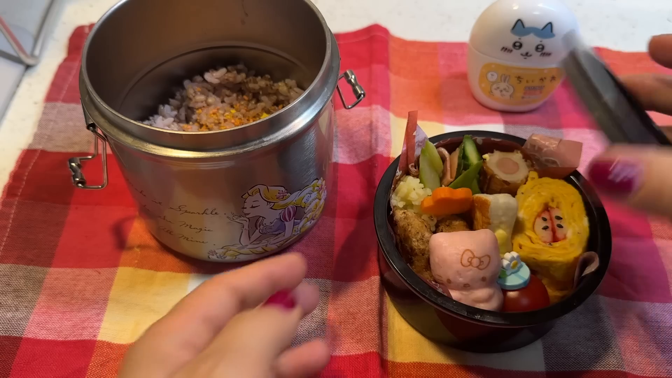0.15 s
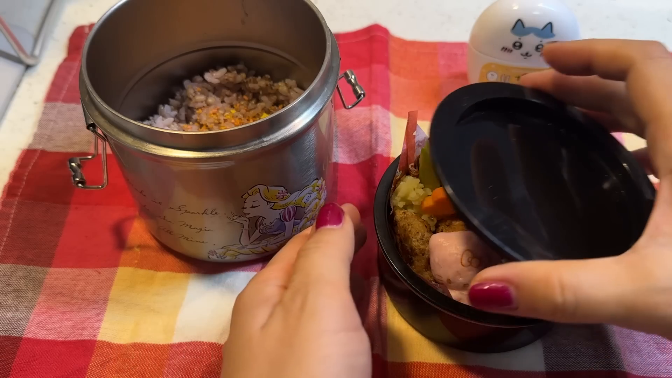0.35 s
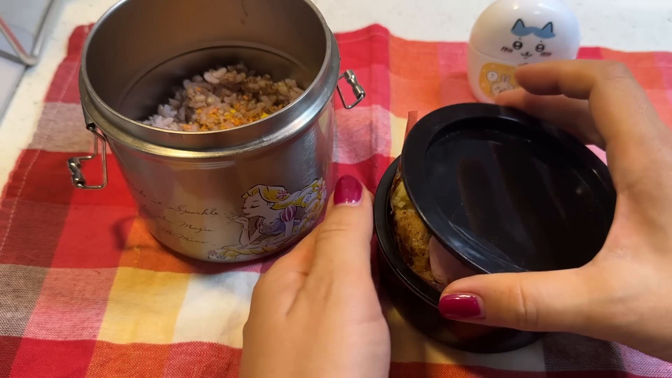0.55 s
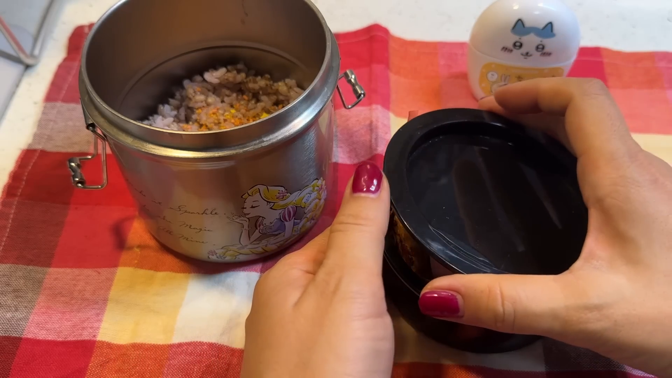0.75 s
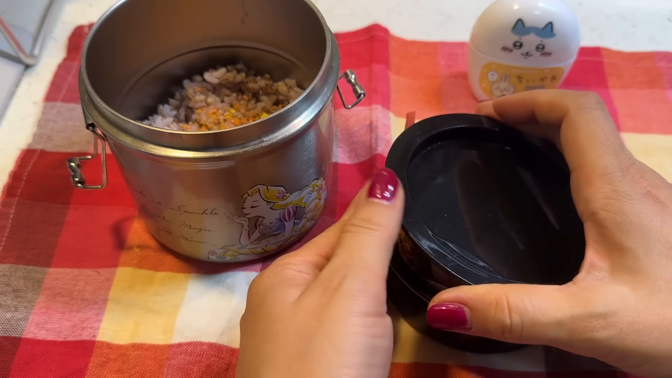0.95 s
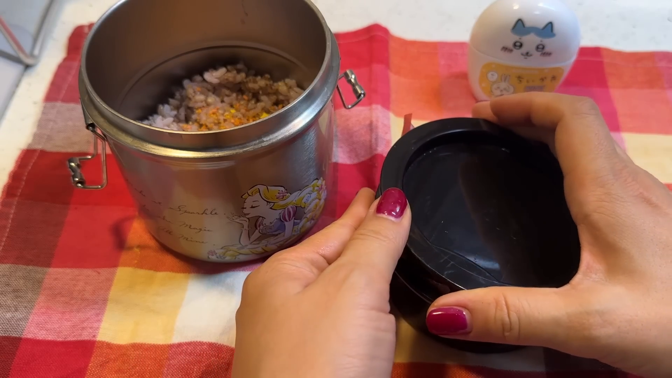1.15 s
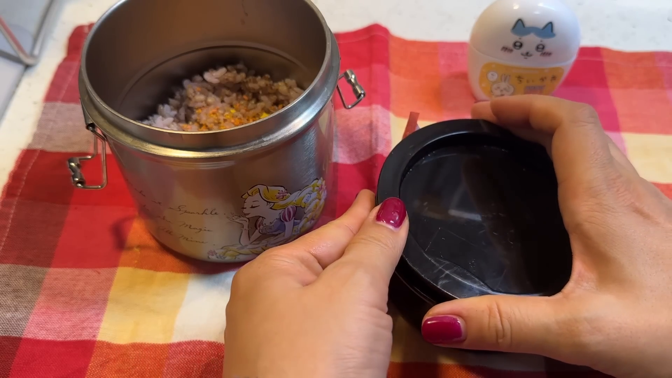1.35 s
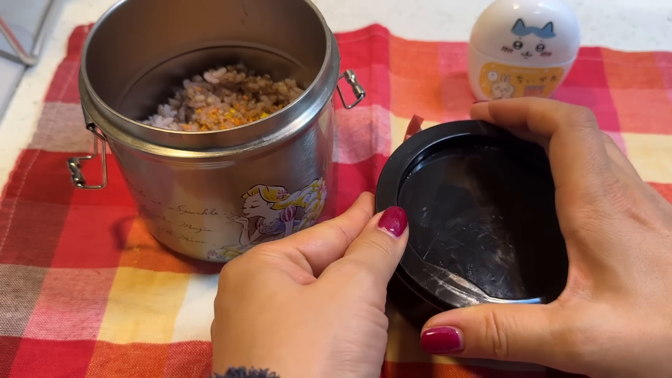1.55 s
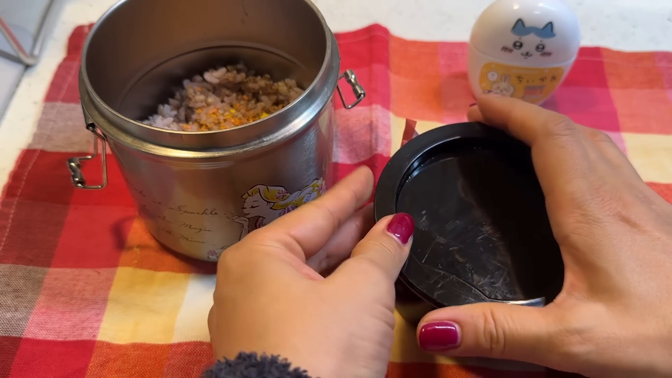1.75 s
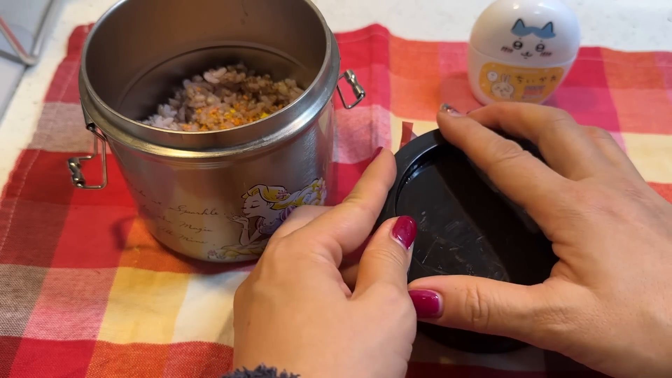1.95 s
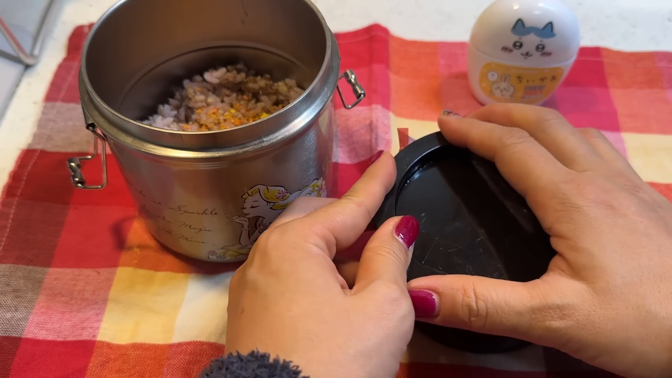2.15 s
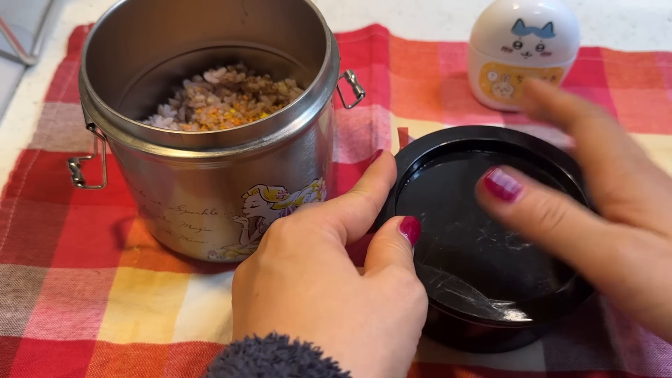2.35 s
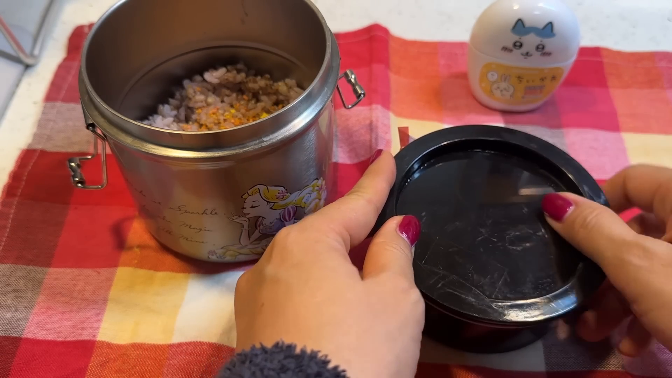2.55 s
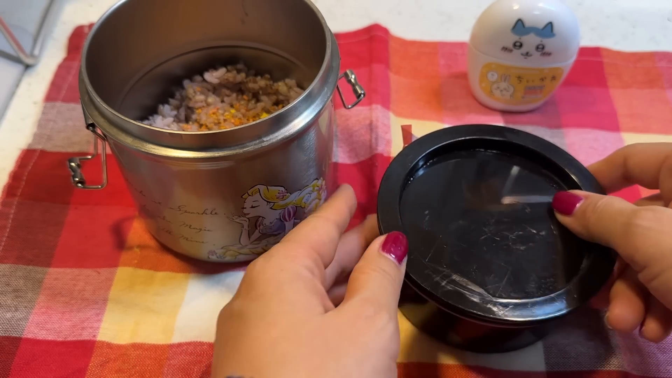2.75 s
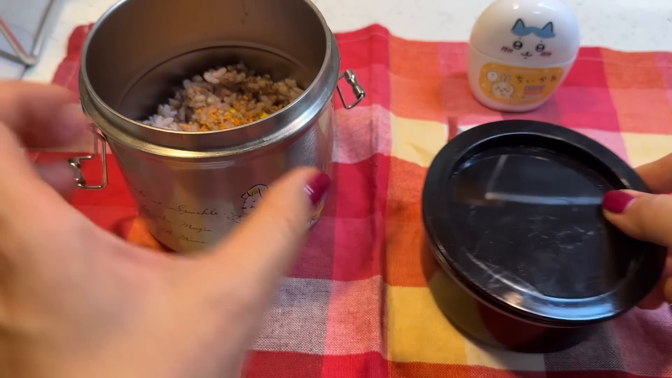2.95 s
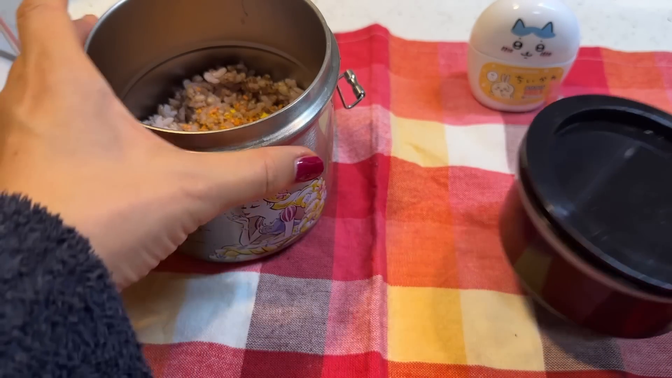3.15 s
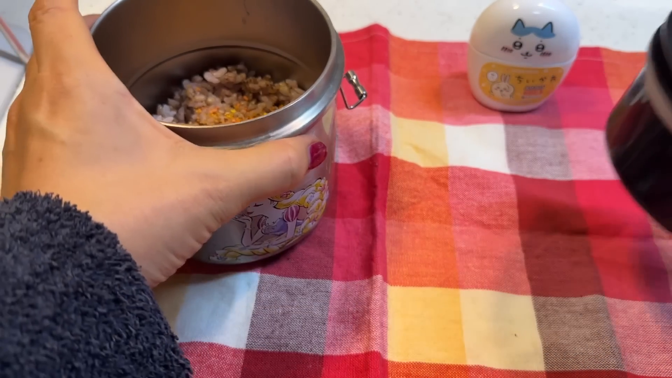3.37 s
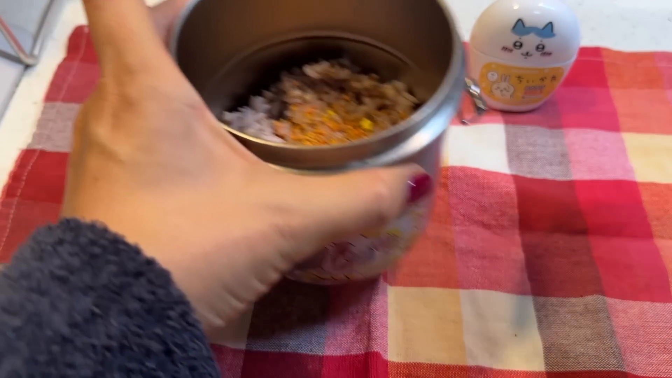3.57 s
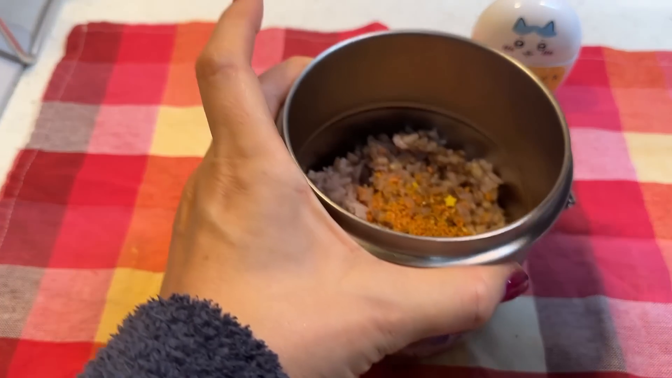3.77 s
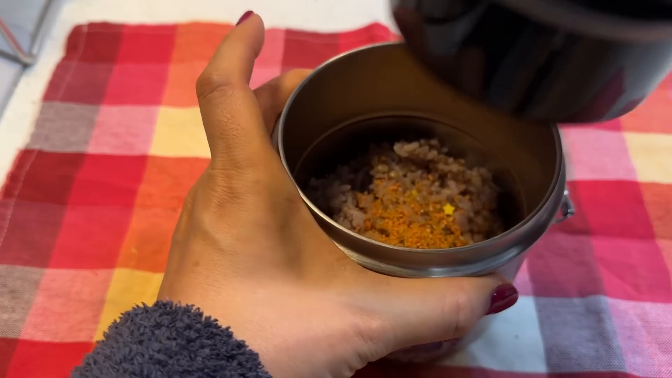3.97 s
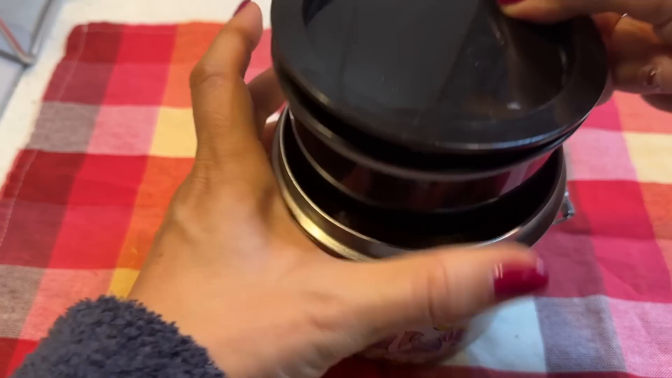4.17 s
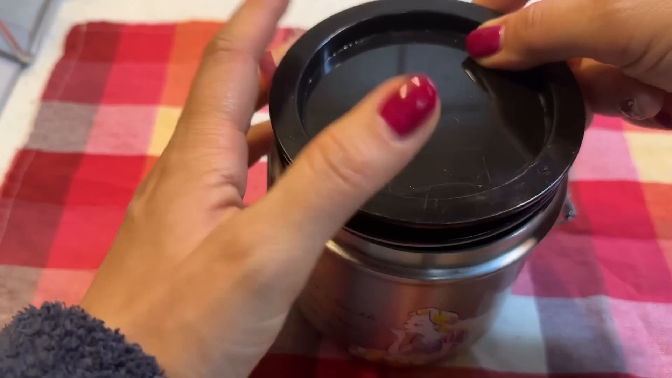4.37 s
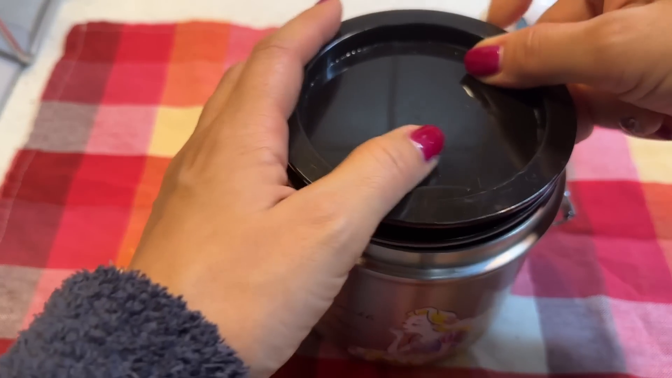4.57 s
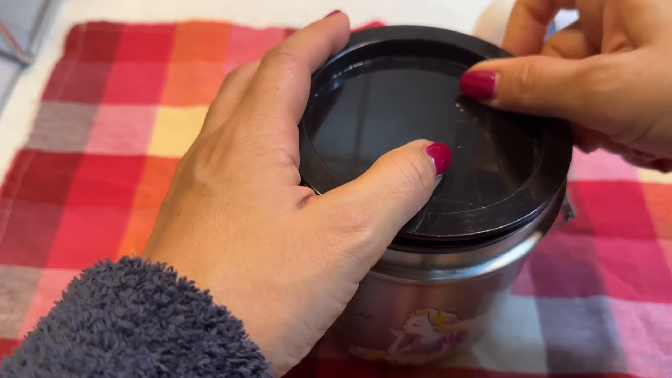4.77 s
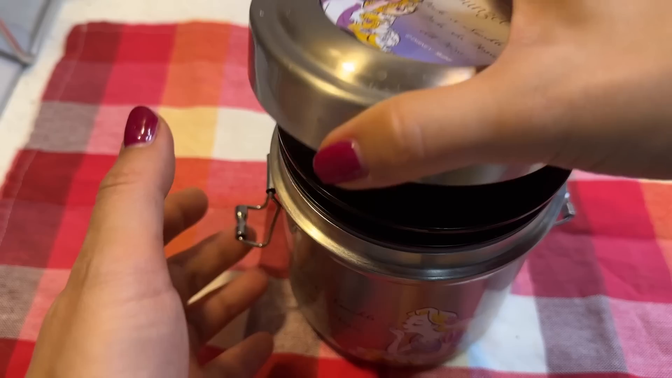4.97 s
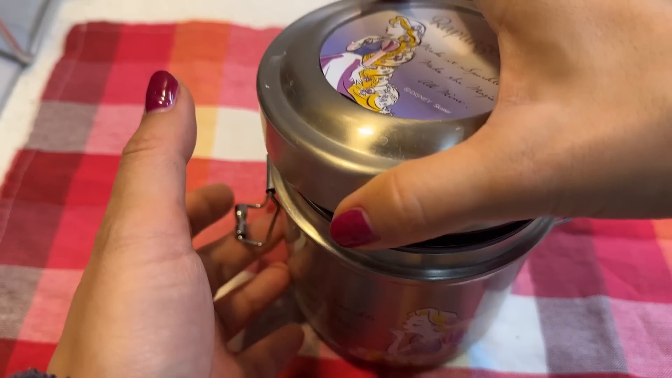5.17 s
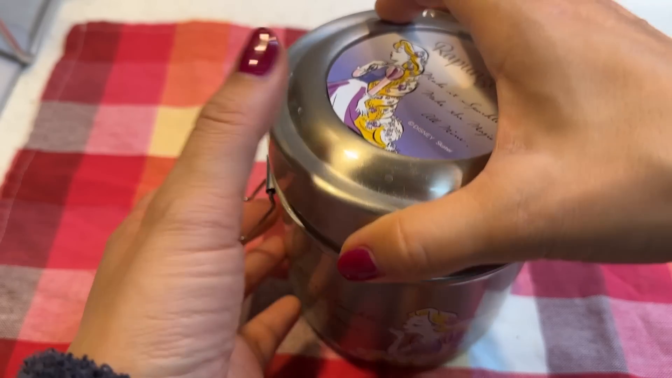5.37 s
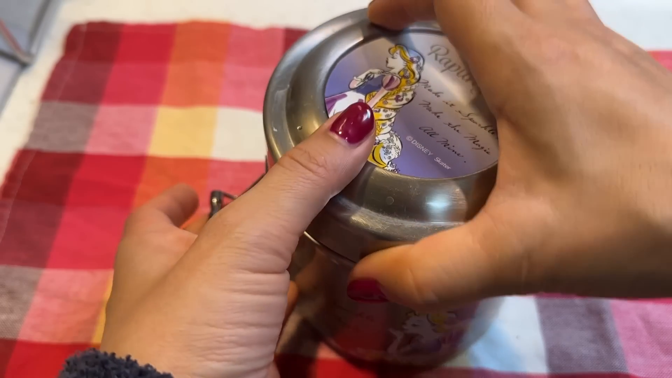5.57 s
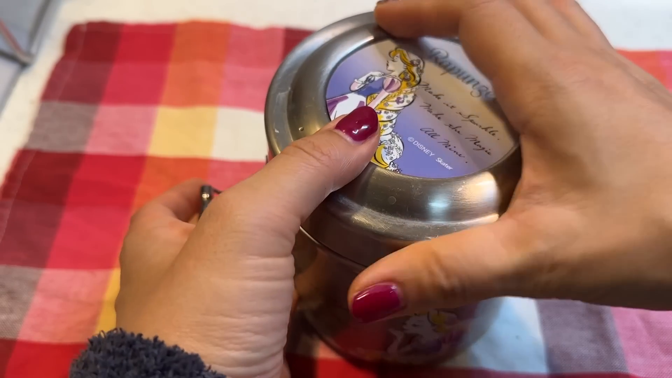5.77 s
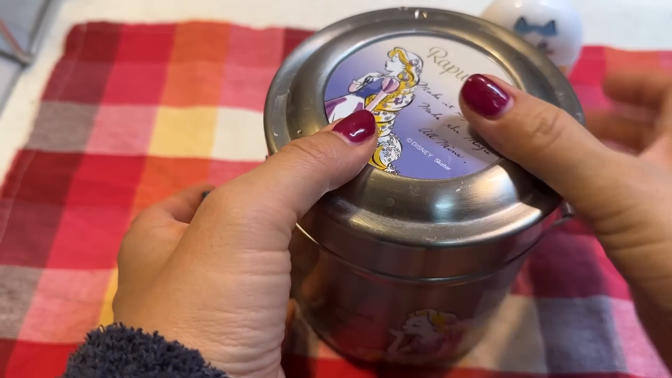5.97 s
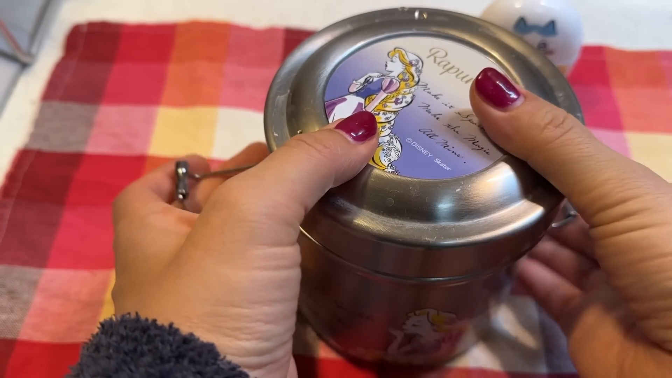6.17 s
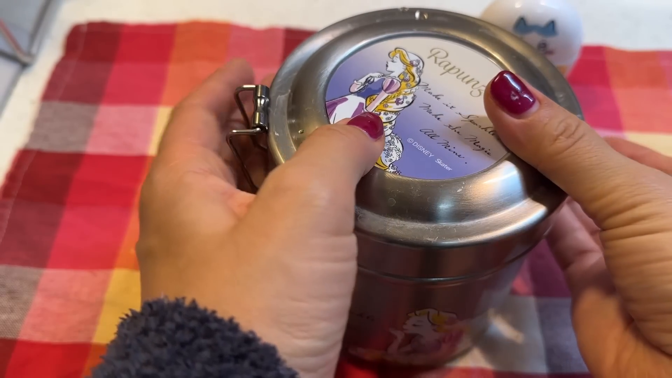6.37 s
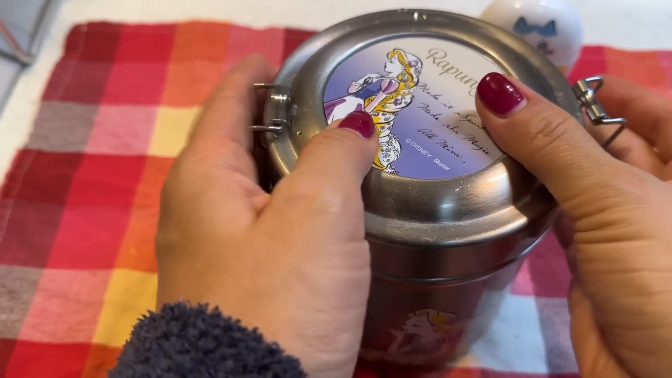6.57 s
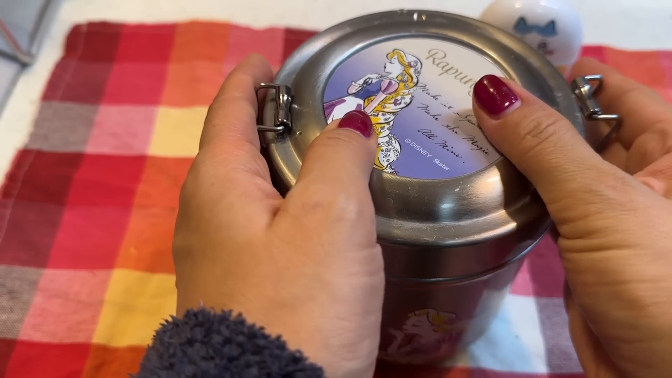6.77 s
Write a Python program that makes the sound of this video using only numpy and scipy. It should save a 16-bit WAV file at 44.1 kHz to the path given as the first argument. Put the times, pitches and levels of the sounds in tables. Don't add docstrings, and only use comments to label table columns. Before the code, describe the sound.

A close phone microphone in a small kitchen, short room reflections over a low faint hum. Faint ticks and soft cloth or skin rubbing open it. At 0.55 s a plastic lid knocks down with a dull thud, followed by light taps until 1.1. From 1.23 to 1.62 it snaps onto its tub in a crackly run of plastic pops, then fingertip ticks and rubs, with a sharp click at 2.0 and smaller taps to 2.5. A quieter stretch holds soft brushing and a light steel knock near 3.5. At 4.13 the tub clunks and scrapes into the pot, settling with a heavier thud and clicks around 4.8. From 5.0 the steel cover scrapes and chatters, seating with a solid clank at 5.58. Small metallic rattles from 6.1 lead to a sharp clasp snap at 6.29 and a louder double snap at 6.53-6.6, with thin high wire ringing fading.

```python
import sys
import numpy as np
from scipy import signal
from scipy.fft import rfft, irfft
from scipy.io import wavfile
from scipy.ndimage import uniform_filter1d

SR = 44100
rng = np.random.default_rng(int(sys.argv[2]) if len(sys.argv) > 2 else 0)


def how_loud(loudness_db):
    steps = np.asarray(loudness_db, float) / 20
    return 10 ** steps


def master(y):
    cut = np.clip(np.atleast_2d(y).T, -1, 1)
    pcm = np.round(cut * 32767)
    wavfile.write(sys.argv[1], SR, pcm.astype(np.int16))


N = 300762

# frequency in Hz, level in dB, decay time t60 in seconds.
LID_MODES = [(619, -3.5, 0.072), (792, -8, .07), (1103, -4.5, .04), (1293, 1, 0.027), (2070, -3.5, 0.023),
             (2717, -12, 0.034), (3240, -13.5, .025), (4030, -10, 0.015), (4530, -8.5, 0.014)]
# frequency in Hz, level in dB, decay time t60 in seconds.
TUB_MODES = [(330, -1, 0.023), (545.7, 2.5, 0.076), (613, -1, 0.067), (817, 2.5, 0.07), (1257, -9, 0.069),
             (1830, -22, 0.038), (2294, -12.5, 0.054), (2436, -9.5, 0.073), (2920, -18.5, 0.2),
             (3750, -27, .08), (4100, -7.5, 0.03), (4610, -11, 0.046), (4900, -10.5, 0.029),
             (5100, -17, 0.024)]
# frequency in Hz, level in dB, decay time t60 in seconds.
RIM_MODES = [(480, -11.5, 0.1), (560, -3.5, 0.043), (811, -3.5, 0.06), (1195, -4.5, 0.24), (1505, -6, 0.18),
             (1820, -13.5, 0.16), (2030, -9.5, 0.28), (2370, -13.5, 0.13), (2980, -4, 0.17),
             (3200, -5, 0.16), (3900, -13.5, 0.13), (4420, -7, 0.04), (4900, -17, .04), (5350, -23, 0.13)]


def unit(x):
    return x / np.sqrt(np.mean(x ** 2))


def on_hz(curve):
    hz, value = np.transpose(curve)
    return np.interp(np.log(np.fft.rfftfreq(N, 1 / SR) + 1), np.log(hz), value)


def band(x, lo_hz, hi_hz):
    return signal.sosfilt(signal.butter(2, [lo_hz, hi_hz], "bandpass", fs=SR, output="sos"), x)


def three(shape):
    bands_hz = ((560, 2040), (1800, 8500), (7000, 10750))
    return [unit(band(rng.standard_normal(shape), lo, hi)) for lo, hi in bands_hz]


def fade(t, t60):
    return np.exp(-np.log(1000) * t / np.clip(t60, .002, 1))


def walk(rate):
    k = int(SR / rate)
    levels = np.repeat(rng.standard_normal(N // k + 1), k)[:N]
    return 1.016 * uniform_filter1d(levels, k)


def add(out, s, wave):
    i = int(s * SR)
    out[i:i + len(wave)] += wave[:N - i]


def hum():
    # frequency in Hz, spectral level in dB per Hz.
    spectrum = [(55, -9.5), (115, -1.5), (170, -12.5), (600, -33), (1500, -42), (4700, -42), (5600, -49),
                (16000, -52.5)]
    mid, side = (rfft(rng.standard_normal(N)) * how_loud(on_hz(spectrum)) for _ in range(2))
    side = side * on_hz([(30, 0.32), (130, 0.17), (500, 0.86), (2000, 0.78)])
    port_db = on_hz([(9800, 1.9), (11000, -8.5), (16000, -7.5)])[None] * np.ones((1, 1))
    both = irfft(np.array([mid + side, mid - side]) * how_loud(port_db), N)
    return both * how_loud(-61) / np.sqrt(np.mean(both.mean(axis=0) ** 2))


def room(x):
    level_db, t60_s, dull_t60_s, bright_t60_s = -13, 0.19, 0.25, 0.18
    t = np.arange(SR // 2) / SR
    dull, middle, bright = three((2, len(t)))
    tail = 0.3 * dull * fade(t, dull_t60_s) + 1.06 * middle * fade(t, t60_s)
    tail = tail + 0.45 * bright * fade(t, bright_t60_s)
    mid, side = tail * np.minimum(t / 0.0071, 1)
    mid = mid + 2.5 * band(mid, 12000, 15800) * fade(t, 0.14)
    side = band(side, 300, 18000)
    tail = np.array([mid + side, mid - side]) / np.sqrt(np.sum(mid ** 2))
    stir = how_loud(1.5 * walk(250)) * np.exp(1.2j * walk(150))
    echo = signal.oaconvolve(x[None], signal.hilbert(tail), axes=1)[:, :N]
    return how_loud(level_db) * (stir * echo).real


def table():
    # start in seconds, peak level in dB, pitch in Hz.
    thuds = [(0.55, -42, 197), (0.649, -53, 202), (0.956, -54.5, 116), (1.308, -51.5, 158),
             (1.232, -51, 593), (1.251, -49, 590), (1.293, -43.5, 595), (1.318, -45, 567),
             (1.345, -50, 480), (1.441, -51, 394), (1.547, -45, 339), (1.893, -47, 106), (2.02, -57.5, 300),
             (2.146, -54.5, 330), (3.345, -61, 400), (3.975, -55, 430), (2.462, -43.5, 125),
             (4.142, -36, 138.8), (4.212, -46.5, 115), (4.327, -38, 350), (4.351, -43, 343),
             (4.476, -43.5, 334), (4.682, -47, 154.4), (4.762, -25.5, 207), (4.819, -43, 175),
             (5.252, -46.5, 166), (5.582, -34, 200), (5.702, -48, 300), (6.08, -55, 202),
             (5.923, -51, 104.3), (6.297, -32, 171), (6.534, -31.5, 186.5), (6.597, -34.5, 188.5)]
    t, out = np.arange(SR // 3) / SR, np.zeros(N)
    for s, peak_db, hz in thuds:
        t60 = 0.08 * (183 / hz) ** 0.16
        wave = np.sin(2 * np.pi * hz * t) * fade(t, t60)
        wave = wave + 0.28 * np.sin(2 * np.pi * 1.6 * hz * t) * fade(t, t60)
        add(out, s + 0.00403, how_loud(peak_db + 3.0) * wave * np.minimum(t / 0.0014, 1))
    return band(out, 55, 4000)


def rubbing():
    # start in s, rise in s, fall in s,
    # hiss level in dB, dull part in dB.
    slides = [(0.001, 0.0042, 0.033, -70, -27), (0.045, 0.02, 0.029, -62, -13),
              (0.069, 0.045, 0.014, -59.5, -18), (.165, 0.013, 0.01, -66.5, -14),
              (0.409, 0.0037, 0.11, -62.5, -15), (.48, 0.046, 0.067, -60, -1.5), (.6, 0.048, 0.12, -69, 5),
              (0.899, 0.045, 0.024, -77.5, 15), (1.241, 0.082, 0.065, -72.5, 19),
              (1.45, 0.08, 0.091, -63.5, 7), (1.721, 0.027, 0.033, -66.5, 3),
              (2.02, .01, 0.11, -59.5, -6.5), (2.29, 0.038, 0.06, -58.5, -10.5),
              (2.7, 0.097, 0.085, -68, -34), (3.318, 0.03, 0.02, -58.5, -5), (3.741, 0.11, 0.01, -83.5, 25)]
    # start in s, rise in s, fall in s, hiss level in dB, dull part in dB.
    scrapes = [(4.119, 0.006, 0.035, -38.5, -20.5), (4.206, 0.025, 0.0084, -41.5, -6),
               (4.292, 0.0025, 0.17, -66, 2.5), (4.502, 0.065, 0.016, -59, -0.5),
               (4.647, 0.03, 0.064, -64, -6.5), (4.75, 0.014, 0.036, -45, 1.5),
               (4.839, 0.053, 0.015, -50, -10.5), (5.007, 0.014, 0.13, -77.5, 7.5),
               (5.08, 0.042, 0.049, -58.5, 2.5), (5.186, 0.0046, 0.086, -55, 1.5),
               (5.271, 0.019, 0.012, -38, -18), (5.3, .015, 0.043, -61, -8.5),
               (5.345, 0.046, 0.012, -56, 5.5), (5.571, 0.0064, 0.023, -40, 2.5), (5.66, .04, 0.12, -70, 4),
               (5.757, 0.067, 0.038, -67, -9), (5.9, 0.031, 0.36, -76, -4),
               (6.099, 0.018, 0.24, -65.5, -3.5), (6.26, 0.039, 0.03, -37, -10),
               (6.492, 0.018, 0.072, -44, -9.5), (6.56, .015, 0.027, -34.5, -16.5)]
    # time in seconds, resonance in Hz.
    cavity_hz = [
        (5.0, 900),
        (5.12, 804),
        (5.22, 600),
        (5.3, 518.6),
        (5.42, 433),
    ]
    t = np.arange(N) / SR
    jerks = how_loud(3.0 * np.minimum(rng.exponential(size=N // 100 + 1), 3.5))
    grain = unit(uniform_filter1d(np.repeat(jerks, 100)[:N], 60))
    skin = t < 4.1
    grain = np.where(skin, 0.18 + 0.48 * grain, grain)
    dull_noise, hiss_noise, bright_noise = three(N)
    hiss_noise = hiss_noise + 0.49 * unit(band(hiss_noise, 2100, 3070)) * skin
    for modes, on in ((TUB_MODES, (t > 4.1) & (t < 4.98)), (RIM_MODES, (t >= 4.98) & (t < 6.09))):
        push = rng.standard_normal(N) * grain
        sing = np.zeros(N)
        for hz, db, t60 in modes:
            sing += how_loud(.5 * db + 5.5 * walk(18)) * unit(band(push, hz - 3 / t60, hz + 3 / t60))
        dull_noise = np.where(on, 0.087 * dull_noise + unit(band(sing, 320, 1800)), dull_noise)
        hiss_noise = np.where(on, 0.54 * hiss_noise + unit(band(sing, 1400, 7000)), hiss_noise)
    cavity_phase = 2 * np.pi * np.cumsum(np.interp(t, *np.transpose(cavity_hz))) / SR
    cavity = band(rng.standard_normal(N), 7.3, 62) * np.cos(cavity_phase)
    dull_noise = dull_noise + 2.0 * unit(cavity) * ((t > 4.98) & (t < 5.5))
    dull_noise = dull_noise + 0.94 * unit(band(rng.standard_normal(N), 230, 410))
    bright_noise = bright_noise + 0.56 * band(bright_noise, 13000, 15000)
    dull, hiss, bright = np.zeros((3, N))
    for s, rise, fall, hiss_db, dull_db in slides + scrapes:
        bright_db = -9.5 - 0.38 * dull_db if s < scrapes[0][0] else 2 - 0.33 * dull_db
        speed = np.clip((t - s) / rise, 0, 1) ** 2 * np.exp(-np.maximum(t - s - rise, 0) / fall)
        speed = how_loud(hiss_db) * speed
        dull = dull + speed * how_loud(dull_db)
        hiss = hiss + speed
        bright = bright + speed * how_loud(bright_db)
    return grain * (dull * dull_noise + hiss * hiss_noise + bright * bright_noise)


def struck(hits, modes, rough, touch, lift_db, air_db, low_hz=100, drift=0):
    # contact time in s, frequency in Hz, change in dB.
    spots = [(4.127, 4900, 7), (4.15, 1830, 6), (4.216, 1830, 9), (4.415, 1830, 31), (4.351, 4100, 3),
             (4.558, 2920, 8.5), (4.15, 1257, 9.5), (4.216, 2436, 3), (4.3, 817, 12), (4.48, 817, 4),
             (4.558, 4100, 6), (4.558, 2436, 9), (4.81, 2436, 6), (4.81, 3750, 11), (5.009, 1505, 12.5),
             (5.009, 2030, 13.5), (5.049, 1505, 5), (5.121, 2030, 16.5), (5.121, 811, 12),
             (5.203, 3200, 10), (5.203, 2030, 8.5), (5.246, 4420, 9), (5.283, 1195, 20.5),
             (5.283, 1820, 4.5), (5.29, 4420, 8.5), (5.328, 4420, 6), (5.304, 2980, 4), (5.304, 3900, 10.5),
             (5.385, 480, 17), (5.812, 4340, 27), (5.882, 3100, 3), (5.882, 1195, -8), (5.882, 1000, 31),
             (5.755, 1810, 22), (5.923, 1810, 24), (6.136, 1200, 5.5), (6.248, 2460, 9), (6.29, 4280, 5),
             (6.526, 4210, 4), (6.542, 4260, 6.5), (6.572, 1074, -7.5)]
    usual_db, spot_octaves = -35, .06
    t, out = np.arange(SR // 4) / SR, np.zeros(N)
    hz, db, t60 = np.transpose(modes)
    spin = np.exp(2j * np.pi * np.outer(hz, t)) * fade(t, t60[:, None])
    grip = 0.5 + 0.71 * np.exp(-t / 0.016)
    knots = np.maximum(1 - abs(t * 160 - np.arange(41)[:, None]), 0)
    for s, peak_db, dull_db, bright_db in hits:
        force_db = peak_db - usual_db
        touch_s = np.clip(touch[0] * how_loud(touch[1] * force_db), .0004, .04)
        ring_db = lift_db[0] + lift_db[1] * force_db

        dull, middle, bright = three(len(t))
        middle = band(middle, 870, 5100)
        crack = how_loud(dull_db) * dull + how_loud(-8.0) * middle + how_loud(bright_db) * bright
        crack = crack * np.exp(-t / touch_s) * (0.65 + 0.32 * np.exp(-t / 0.00028))

        mode_db = np.interp(np.log(hz), np.log([900, 3500, 10000]), [dull_db, -6, bright_db])
        for at, spot_hz, spot_db in spots:
            if abs(at - s) < 1 / 250:
                mode_db = mode_db + spot_db * np.exp(-(np.log2(hz / spot_hz) / spot_octaves) ** 2)
        level_chance, phase_chance = rng.standard_normal((2, len(hz)))
        real, imag = rng.standard_normal((2, 41, len(hz)))
        waver = 1 + rough * np.minimum(0.12 / t60[:, None], 1) ** 2 * ((real + 1j * imag).T @ knots)
        if drift:
            waver = waver * np.exp(2j * np.pi * drift * np.outer(hz * real[0], t))
        strength = how_loud(db + mode_db + 2 * level_chance) * np.exp(3j * phase_chance)
        ring = (strength @ (spin * waver)).real
        ring = how_loud(ring_db) * ring * grip * np.minimum(t / (.5 * touch_s), 1)
        add(out, s, how_loud(peak_db) * (crack + ring) * np.minimum(t / 0.00088, 1))
    return band(out, low_hz, 20000) + how_loud(air_db) * band(out, 11600, 16000)


def ticks():
    # start in seconds, peak level in dB, dull part in dB, bright part in dB.
    hits = [(0.01, -50, -20, -1), (0.026, -58, -33, -1), (0.172, -60, -30, 2), (0.184, -55, -25, -5),
            (0.5094, -52.5, -11, -14), (0.7244, -59, -12, -14), (0.7594, -62, -14, -14),
            (1.0514, -66, -14, -10), (1.3244, -42, -14, -14), (1.3844, -50, -16, -14),
            (1.4274, -57, -14, -14), (1.4924, -45, -3, -14), (1.6464, -47, -10, -14),
            (1.6844, -53, -15, -18), (1.7144, -55, -16, -14), (1.7499, -44, -23, -15.5),
            (1.7694, -64, -14, -13), (1.7863, -48, -8.5, -16), (1.8094, -54, -14, -16),
            (1.8594, -55, -16, -15.5), (1.8836, -47, -9.5, -19), (1.9594, -55, -11, -13),
            (1.9994, -41.5, -24.5, -13.5), (2.3444, -45, -12, -13), (2.4494, -58, -14, -17),
            (2.5067, -39, -28, -17), (3.8397, -65, -12, -14), (6.0586, -55, -18, -17)]
    return struck(hits, LID_MODES, 0.96, touch=(.0015, -.02), lift_db=(-8, -.02), air_db=-6.5, low_hz=800)


def lid():
    # start in seconds, peak level in dB, dull part in dB, bright part in dB.
    hits = [(0.419, -54, -20.5, -25), (0.553, -17.5, 2.5, -38), (0.657, -52.5, 14.5, -33),
            (0.677, -34.5, -6.5, -20), (0.82, -23, -30.5, -22), (0.918, -37, -37, -13),
            (0.928, -33.5, -18.5, 4), (0.944, -27.5, -43, -22), (0.961, -65.5, 19.5, -25),
            (1.094, -51, -7, -7), (1.123, -31.5, -26, 7), (2.022, -16, -26.5, 4), (2.091, -24, -29, -10),
            (2.149, -25.5, -26, -11), (2.322, -42.5, -22, 0), (2.517, -32.5, -22, -35), (2.81, -51, -12, 0),
            (3.145, -47.5, -45, 14)]
    return struck(hits, LID_MODES, 0.8, touch=(.0028, -.2), lift_db=(-4, -.3), air_db=0, low_hz=772)


def seal():
    # start in seconds, peak level in dB, dull part in dB, bright part in dB.
    hits = [(1.231, -21, -5.5, -3.5), (1.251, -23.5, -8.5, -6), (1.297, -20, -13, -4.5),
            (1.308, -28, -11.5, -0.5), (1.364, -26.5, -13, 4), (1.414, -34, -15, -32),
            (1.462, -24, -13.5, -4), (1.523, -19, -36, -10), (1.548, -42, -12, 13),
            (1.553, -20.5, -13.5, -20), (1.565, -33.5, -19, 3), (1.613, -32, -7.5, -5),
            (1.624, -36, -43, 3.5), (1.739, -42, -32, -12)]
    return struck(hits, LID_MODES, 0.17, touch=(.004, -.25), lift_db=(-8, -.2), air_db=-6.0, low_hz=704)


def pot():
    # start in seconds, peak level in dB, dull part in dB, bright part in dB.
    hits = [
        (3.312, -52, 9.5, -43),
        (3.347, -46, -5, -24),
        (3.41, -45, 0.5, -39),
        (3.479, -28.5, -13.5, -10.5),
        (3.57, -55.5, 13, -39.5),
        (3.776, -62.5, 17.5, -47),
        (3.98, -49, 10, -43),
        (4.083, -40.5, 4, -31),
    ]
    # frequency in Hz, level in dB, decay time t60 in seconds.
    modes = [(870, -11.5, 0.11), (2350, -22, .09), (2820, -20, 0.023), (3590, -32.5, 0.055),
             (4570, -31.5, .07), (6700, -38, .3), (8600, -27, 0.11), (9600, -56, .4)]
    return struck(hits, modes, 0.2, touch=(.004, -.1), lift_db=(4, 1.6), air_db=7.0, low_hz=300)


def tub():
    # start in seconds, peak level in dB, dull part in dB, bright part in dB.
    hits = [(4.127, -19.5, -22.5, 1), (4.15, -15, -5, 0), (4.216, -26.5, -23, 5.5), (4.3, -33.5, -26, 0),
            (4.332, -40.5, -18, 4.5), (4.351, -38, -18.5, -9), (4.415, -59.5, -17, 8),
            (4.48, -41, -11.5, 1), (4.558, -39.5, -38, -23.5), (4.764, -39, -10, -11.5),
            (4.81, -23.5, -26.5, 5.5), (4.836, -27, -25, -7), (4.869, -35.5, -23, 7)]
    return struck(hits, TUB_MODES, 0.51, touch=(.009, .05), lift_db=(4, -.15), air_db=1.5, drift=.015)


def rim():
    # start in seconds, peak level in dB, dull part in dB, bright part in dB.
    hits = [(5.009, -54.5, 4, -48), (5.049, -43.5, -5.5, 3.5), (5.098, -38, -7, 1), (5.121, -34, -0.5, -31),
            (5.138, -41, -20, -0.5), (5.203, -30.5, -7.5, -4), (5.246, -32, -7, -1), (5.277, -40, 8.5, -24),
            (5.283, -31.5, -14, 0.5), (5.29, -31.5, -19, -5), (5.304, -24, -15.5, -5),
            (5.328, -32.5, -19.5, -9.5), (5.349, -36.5, -15, -5.5), (5.385, -44, -2.5, -11.5)]
    return struck(hits, RIM_MODES, 0.33, touch=(.0045, .15), lift_db=(-6, -.1), air_db=3.0, drift=.008)


def cover():
    # start in seconds, peak level in dB, dull part in dB, bright part in dB.
    hits = [
        (5.584, -12, -1, -11.5),
        (5.704, -63, 0, -18),
        (5.755, -61, -9, -20),
        (5.812, -66.5, -11, -23),
        (5.882, -57, 0, -30.5),
        (5.923, -56.5, -7, -9),
    ]
    # frequency in Hz, level in dB, decay time t60 in seconds.
    modes = [(872, -17.5, 0.17), (1000, -30, .03), (1195, -5, 0.095), (1300, -14, 0.044),
             (1700, -15.5, 0.038), (1810, -27, 0.12), (2300, -10.5, 0.038), (2480, -9, 0.066),
             (3020, -19, 0.12), (3080, 2, 0.033), (3900, -9.5, 0.059), (4340, -21, .1), (4550, -14, 0.04),
             (5700, -24, .04)]
    return struck(hits, modes, 0.25, touch=(.004, .08), lift_db=(5.5, .02), air_db=-5.0)


def wire():
    # start in seconds, peak level in dB.
    flicks = [
        (6.291, -47),
        (6.527, -46),
        (6.573, -47.5),
        (6.594, -41),
    ]
    # level in dB, decay time t60 in seconds.
    partials = [(-10, .25), (3.5, .4), (-14.5, 0.33), (-14, .4), (-9, .5), (-1.5, .4), (-6, .3), (-10, .2),
                (-7, .15), (-5, 0.31), (-15.5, .15), (-17.5, .3)]
    partial_hz = (9421, 10345, 10780, 10960, 11680, 12490, 13400, 13650, 14200, 14410, 15280, 15490)
    t, out = np.arange(SR // 2) / SR, np.zeros(N)
    db, t60 = np.transpose(partials)
    for s, peak_db in flicks:
        level_chance, phase_chance = rng.standard_normal((2, len(db), 1))
        level = how_loud(peak_db + db[:, None] + 2 * level_chance)
        tone = np.sin(2 * np.pi * np.outer(partial_hz, t) + 3 * phase_chance)
        add(out, s, np.sum(level * tone * fade(t, t60[:, None]), axis=0))
    return out


def clasps():
    # start in seconds, peak level in dB, dull part in dB, bright part in dB.
    hits = [(6.109, -35.5, -13.5, -1), (6.135, -41.5, -7, -12), (6.175, -25, -20, -0.5),
            (6.208, -32, -15, -5), (6.228, -33.5, -21, -1), (6.248, -22.5, -9, -1.5),
            (6.29, -9.5, -24.5, 2.5), (6.305, -11.5, -31, -11), (6.447, -32.5, -20, -16),
            (6.526, -2, -24, 1.5), (6.542, -11, -20.5, -16), (6.572, -17, -18.5, 4),
            (6.593, -5, -25.5, 2.5), (6.605, -7, -48.5, -13), (6.615, -26, -17, 4),
            (6.773, -46, -27.5, -37)]
    # frequency in Hz, level in dB, decay time t60 in seconds.
    modes = [(1065, -1.5, 0.11), (1908, -28.5, 0.03), (2470, -17.5, 0.14), (3120, -15.5, 0.09),
             (3850, -20.5, 0.149), (4090, -20.5, 0.05), (4280, -6, 0.057), (4590, -14.5, 0.11),
             (6000, -21.5, 0.1), (7300, -26, .18), (8300, -16.5, .16), (8730, -4, 0.03),
             (9440, -18.5, 0.091), (13500, -23.5, 0.025)]
    # frequency in Hz, level in dB, decay time t60 in seconds.
    shut_modes = [(1200, 4, 0.11), (1927, 2, 0.078), (2765, -21, 0.13), (3016, -4.5, 0.054),
                  (3352, -13.5, 0.18), (3830, -13, 0.19), (4180, -10, 0.089), (5530, -17.5, 0.16),
                  (6800, -20.5, 0.16), (7500, -24.5, 0.083), (8150, -19, 0.2), (8400, -13.5, 0.11)]
    first = struck(hits[:9], modes, 0.91, touch=(.0055, .08), lift_db=(-4, .2), air_db=3.5)
    second = struck(hits[9:12], modes, 0.6, touch=(.009, -.25), lift_db=(-3, -.02), air_db=5.0)
    last = struck(hits[12:], shut_modes, 0.92, touch=(.009, -.25), lift_db=(-6, -.02), air_db=4)
    return first, second + last


def scene():
    # frequency in Hz, phase by which the left port leads in radians.
    ports = [(100, .1), (1300, .7), (2800, 1.4), (4600, .8), (10500, 2.1), (11900, 3.3), (13000, 5.1),
             (16500, 7.4)]
    # frequency in Hz, level in dB.
    colour = [(100, 6.5), (1000, -3), (9300, -4.5), (11400, -3), (13000, 3), (15700, 7.5), (16200, -12.5),
              (17000, -42)]
    first_clasp, second_clasp = clasps()
    # signal, left over right in dB, level sent to the room in dB
    objects = ((table(), .2, -.3), (rubbing(), .8, -.3), (ticks(), .4, -3), (lid(), .5, -3),
               (seal(), .5, -1.5), (pot(), .3, -.5), (tub(), 1.1, -.5), (rim(), .6, -.6),
               (cover(), 2.3, -4), (wire(), .6, -12), (first_clasp, .5, -.4), (second_clasp, .7, -.3))
    near = sum(x * how_loud(np.array([[pan_db], [-pan_db]]) / 2) for x, pan_db, _ in objects)
    far = sum(x * how_loud(wet_db) for x, _, wet_db in objects)
    turn = np.exp(.5j * on_hz(ports))
    spectrum = rfft(near + room(far)) * np.array([turn, turn.conj()])
    heard = irfft(spectrum * how_loud(on_hz(colour)), N)
    return heard + hum() * how_loud(np.interp(np.arange(N) / SR, [.3, .5], [-4, 0]))


def low_pass(x):
    return signal.sosfilt(signal.butter(12, 16970, fs=SR, output="sos"), x)


def record(dry):
    top = .97
    mix = dry / (1 + (abs(dry) / top) ** 4) ** (1 / 4)
    return low_pass(mix)


dry = scene()
out = record(dry)
master(out)
```